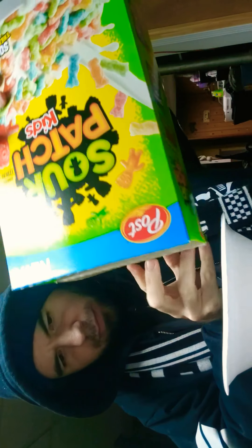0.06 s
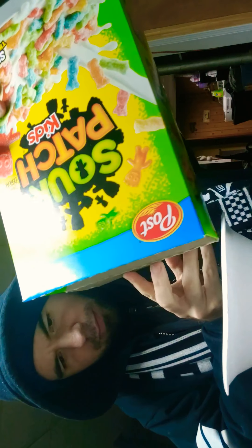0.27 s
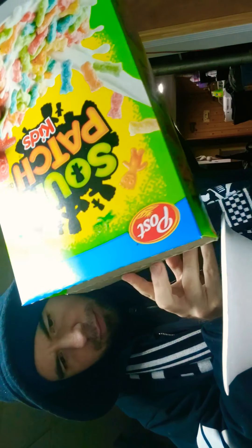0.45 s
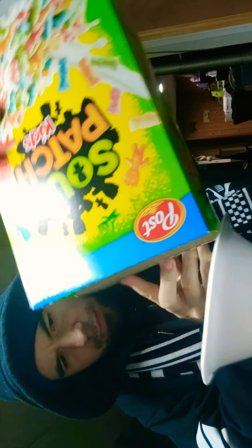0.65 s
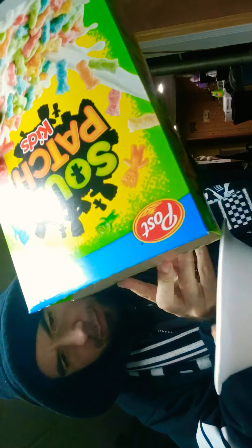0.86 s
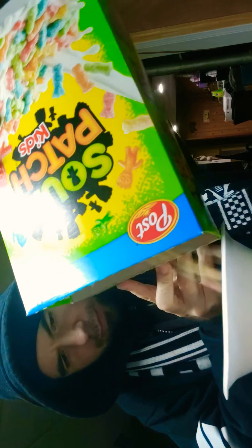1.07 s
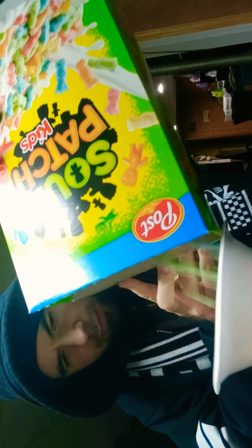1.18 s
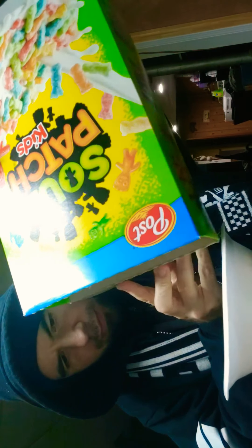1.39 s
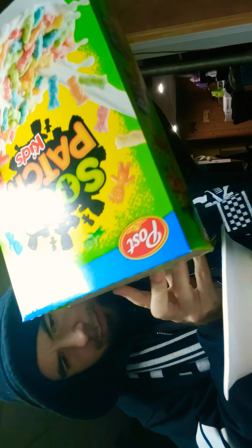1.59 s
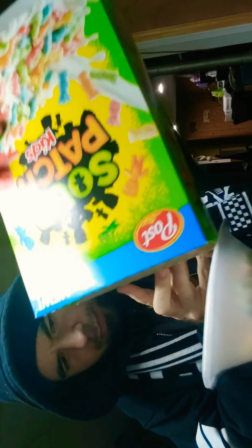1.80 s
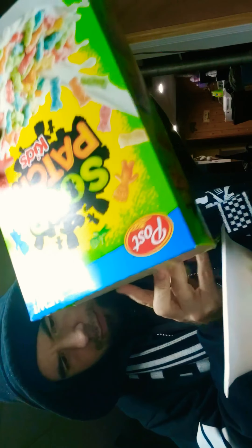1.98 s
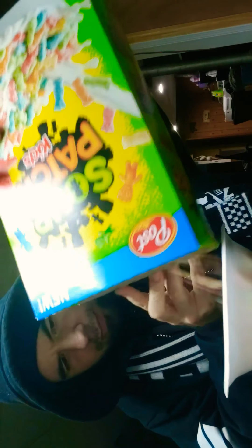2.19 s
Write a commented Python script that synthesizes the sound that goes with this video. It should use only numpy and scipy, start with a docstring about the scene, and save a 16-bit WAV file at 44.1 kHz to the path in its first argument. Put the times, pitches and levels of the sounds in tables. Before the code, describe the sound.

Cereal pours from a box in a dry, hollow clatter with light bag crackle.

```python
"""Pouring dry cereal

Cereal is shaken out of a tilted cardboard box toward a bowl, close by in a quiet room.
Short, dry knocks sound, then a rush of pieces tumbles and thins out; both excite the same hollow modes.
The liner bag crackles under the sliding pieces; the box rumbles in the hands and booms when bumped."""
import sys
import numpy as np
from scipy import signal
from scipy.fft import rfft, irfft, next_fast_len
from scipy.io import wavfile

SR = 44100
rng = np.random.default_rng(int(sys.argv[2]) if len(sys.argv) > 2 else 0)


def put_to_file(sound):
    """Save the sound as 16-bit audio at rate SR, in the file named by the first command-line argument."""
    columns = np.atleast_2d(sound).T  # one column per channel
    safe = np.clip(columns, -1, 1)
    whole_steps = np.round(safe * 32767)
    wavfile.write(sys.argv[1], SR, whole_steps.astype(np.int16))


N = 99225
TIME = np.arange(N) / SR

# Hollow, middle and treble modes that every contact excites: (frequency [Hz], level [dB], T60 [s])
LOW_MODES = [(398.3, -8, 0.036), (505, -6.5, 0.03), (595, -5.5, 0.016), (749.4, -4.5, 0.035)]
MAIN_MODES = [(948.7, -2.5, 0.083), (1082, -2, 0.085), (1150, 0.5, 0.092), (1229, 2, 0.055),
              (1311, -12.5, 0.029), (1522, -12, 0.09), (1792, -4, 0.018), (2008, -9, 0.053)]
CRACK_MODES = [(1675, 11.5, 0.0032), (2270, -1.5, 0.01), (2850, 0.5, 0.015), (3480, -3, 0.015),
               (3873, 1, 0.013), (5186, 5, 0.0036), (6280, -19.5, 0.0057)]


def from_db(db):
    """Amplitude ratio: a factor of ten for every 20 dB."""
    return 10 ** (np.asarray(db) / 20)


def unit_rms(x):
    """Normalisation to unit mean power."""
    return x / np.sqrt(np.mean(x ** 2) + 1e-20)


def envelope(curve):
    """Amplitude envelope interpolated through (time [s], level [dB])."""
    return from_db(np.interp(TIME, *np.transpose(curve)))


def band(x, low_hz, high_hz):
    """Butterworth band-pass filter."""
    edges_hz = [low_hz, min(high_hz, .45 * SR)]
    return signal.sosfilt(signal.butter(2, edges_hz, "band", fs=SR, output="sos"), x)


def colour(x, response):
    """Minimum-phase filter through (frequency [Hz], gain [dB])."""
    size = 2 * next_fast_len(N)
    hz, db = np.transpose(response)
    bin_hz = np.arange(size // 2 + 1) * SR / size
    gain = from_db(np.interp(np.log(bin_hz + 1), np.log(hz), db))
    cepstrum = irfft(np.log(gain))
    cepstrum[1:size // 2] *= 2   # folding the cepstrum makes the filter causal
    cepstrum[size // 2 + 1:] = 0
    return irfft(rfft(x, size) * np.exp(rfft(cepstrum)))[:N]


def ring(force, hz, t60):
    """Damped harmonic oscillator: each impulse starts an exponentially decaying sinusoid."""
    radius, angle = from_db(-60 / (t60 * SR)), 2 * np.pi * hz / SR
    return signal.lfilter([.5, 0, -.5], [1, -2 * radius * np.cos(angle), radius ** 2], force + 1e-18)


def impulses(per_s, spread_db):
    """Poisson process: independent impulses of uneven size and either sign."""
    sizes = from_db(spread_db * np.minimum(rng.exponential(1, N), 4)) * rng.choice([-1, 1], N)
    return sizes * (rng.random(N) < per_s / SR)


def place(onsets, shapes):
    """Superposition of waveforms, each delayed to its onset in seconds."""
    out = np.zeros(N + SR)
    for onset, shape in zip(onsets, shapes):
        start = max(int(onset * SR), 0)
        out[start:start + len(shape)] += shape
    return out[:N]


def room_tone():
    """Stationary noise, weighted toward low frequencies, forms the faint background."""
    # Background spectrum: (frequency [Hz], relative density [dB])
    spectrum = [(20, -45), (60, 1), (170, -1.5), (350, -7), (1100, -0.5), (3000, -17), (8000, -34),
                (15000, -30)]
    return from_db(-72) * unit_rms(colour(rng.standard_normal(N), spectrum))


def reverberation(direct, t60=0.18, delay_s=0.006):
    """Diffuse reflections: convolution with exponentially decaying noise, dulled in the treble."""
    tail = rng.standard_normal(N) * from_db(-60 * TIME / t60) * (TIME > delay_s)
    reflections = signal.fftconvolve(direct, tail / np.linalg.norm(tail))[:N]
    return from_db(-11) * band(reflections, 110, 5860)


def box_rumble():
    """Forced vibration: the hands move the cardboard, which radiates low-frequency noise."""
    # Handling envelope: (time [s], level [dB])
    handling = [(0.0, -63.5), (0.27, -71.5), (0.32, -40.5), (0.49, -64), (0.53, -50), (0.59, -57),
                (0.63, -41), (0.95, -54), (1.01, -44.5), (1.69, -50.5), (1.81, -60), (1.89, -36),
                (1.92, -48), (1.95, -31.5), (1.98, -45), (2.02, -40.5), (2.08, -49), (2.25, -44)]
    # Cardboard spectrum: (frequency [Hz], relative density [dB])
    spectrum = [(20, -38), (32, -29), (48, 3.5), (115, -2.5), (180, -0.5), (300, -4.5), (500, -7.5),
                (1000, -19), (3000, -105)]
    return from_db(0.5) * envelope(handling) * unit_rms(colour(rng.standard_normal(N), spectrum))


def box_bumps():
    """Free vibration: each jolt leaves the low modes of the box ringing, in alternating polarity."""
    # Jolts to the box: (time [s], level [dB])
    bumps = [(0.324, -31), (0.357, -36), (0.634, -32), (1.943, -19)]
    # Box modes: (frequency [Hz], level [dB], T60 [s])
    modes = [(56, -1, 0.052), (112, -10, 0.21), (172, -4, 0.041), (265, -6, 0.013), (477, 0.5, 0.078)]
    onsets, jolt_db = np.transpose(bumps)
    jolts = place(onsets, from_db(jolt_db)[:, None])
    booms = sum(from_db(db) * (-1) ** k * ring(jolts, hz, t60) for k, (hz, db, t60) in enumerate(modes))
    return signal.sosfilt(signal.butter(2, 700, fs=SR, output="sos"), booms)


def liner_crackle(bunches_per_s=150, bunch_db=6):
    """Modulated shot noise: pieces sliding over the liner bag make tiny clicks in bunches."""
    # Sliding envelope: (time [s], level [dB])
    sliding = [(0, -82), (0.2, -80.5), (0.33, -57), (0.42, -74), (0.48, -76), (0.57, -65), (0.61, -57),
               (0.74, -55), (0.78, -49), (0.92, -48), (1.01, -50.5), (1.11, -45), (1.23, -47),
               (1.29, -49.5), (1.39, -53), (1.62, -57), (1.69, -60.5), (1.745, -79), (1.8, -55.5),
               (1.88, -47), (1.91, -53.5), (1.98, -56), (2.09, -60.5), (2.15, -54.5), (2.25, -56.5)]
    # Liner spectrum: (frequency [Hz], relative density [dB])
    spectrum = [(300, -5), (1500, -14.5), (3600, 5), (5300, 0), (6500, -6), (8400, -14.5), (9800, -10.5),
                (10500, -14.5), (11900, -8), (13000, -19.5), (15500, -30)]
    bunches = np.interp(TIME * bunches_per_s, np.arange(N), np.clip(rng.standard_normal(N), -2, 2))
    crackle = impulses(per_s=2900, spread_db=2) * from_db(bunch_db * bunches)
    return from_db(4) * envelope(sliding) * unit_rms(colour(crackle, spectrum))


def tumble():
    """Random excitation: a stream of small pieces drives the modes into a continuous patter."""
    # Envelope of the stream: (time [s], level [dB])
    flow = [(0, -36), (0.05, -113), (0.21, -58.5), (0.32, -42), (0.42, -42.5), (0.49, -60), (0.58, -42.5),
            (0.64, -30), (0.74, -43), (0.79, -24.5), (0.9, -20), (1.01, -34.5), (1.12, -24), (1.23, -28),
            (1.3, -25.5), (1.4, -35.5), (1.6, -42), (1.74, -74), (1.8, -42), (1.91, -42.5), (2.0, -31.5),
            (2.09, -58), (2.25, -40)]
    impacts = impulses(per_s=600, spread_db=3)
    patter = np.zeros(N)
    for modes, group_db in ((LOW_MODES, -3), (MAIN_MODES, 0), (CRACK_MODES, -7)):
        for hz, db, t60 in modes:
            patter += from_db(db + group_db) * ring(impacts * rng.standard_normal(N), hz, t60)
    return from_db(-0.5) * envelope(flow) * unit_rms(band(patter, 260, 4100))


def rough_contacts(count, size=1400, touch_decay_s=0.0033, rebound_decay_s=0.0067, rebounds_per_s=450):
    """Multiple contact: an impulse, a burst of tiny touches and rebounds; one unit-energy force a row."""
    t = np.arange(size) / SR
    force = rng.standard_normal((count, size)) * np.exp(-t / touch_decay_s)
    force /= np.linalg.norm(force, axis=1, keepdims=True)
    force[:, 0] += 1   # the first impulse is as strong as the whole burst
    rebounds = rng.standard_normal((count, size)) * (rng.random((count, size)) < rebounds_per_s / SR)
    force += from_db(-1) * rebounds * np.exp(-t / rebound_decay_s)
    return force / np.linalg.norm(force, axis=1, keepdims=True)


def strike(onsets, db, modes, contacts, scatter_db=2):
    """Modal superposition: each mode's strength and sign vary at random with the spot that is hit."""
    out = np.zeros(N)
    for hz, mode_db, t60 in modes:
        strength = from_db(db + mode_db + scatter_db * rng.standard_normal(len(db)))
        strength *= rng.choice([-1, 1], len(db))
        out += ring(place(onsets, contacts * strength[:, None]), hz, t60)
    return out


def clack(hz, rise_s=0.0013):
    """Heavily damped resonance: it swells within a cycle or two and dies quickly."""
    t = TIME[:SR // 20]
    return t / rise_s * np.exp(1 - t / rise_s) * np.sin(2 * np.pi * hz * t)


def knocks():
    """Impulsive excitation: short, dry knocks, each a clack, a hollow ring and a crack in the treble."""
    # Short, dry knocks, with the last four levels relative to the first: (time [s], level [dB],
    # clack frequency [Hz], after-ring [dB], hollow lows [dB], crack [dB], sparkle [dB])
    dry_knocks = [(0.0043, -32.5, 1220.0, -9, -30, -43, -25), (0.0943, -50.5, 1440, -10, -3, -6, -15),
                  (0.113, -53, 1020, -22, -12, -18, -27), (0.2418, -15.5, 1220, -5, -6.5, -10.5, -25),
                  (0.2468, -16, 1180, -6.5, -11.5, -12.5, -33), (0.2549, -7.5, 1500, -17, -22, -15, -43),
                  (0.3006, -17.5, 1160.0, -17, -9, -12.5, -45), (0.3276, -14, 1097, -21, -13, -23, -41),
                  (0.3585, -4.5, 1300, -10.5, -11.5, -17.5, -39),
                  (0.3774, -21.5, 1300, -4, -13, -11.5, -28), (0.4196, -26.5, 1380, -10.5, -14, -13, -37),
                  (0.4316, -39, 1330.0, -8, -5, -6.5, -35), (0.5143, -13, 1285, -9, -12.5, -15.5, -35),
                  (0.5466, -33, 1040, -8, 1.5, -3.5, -34), (0.5957, -20, 1380, -18, -10, -13.5, -39),
                  (0.6211, -14, 1020, -8.5, -14, -15.5, -35), (0.6343, -11, 1140, -10, -14, -36, -54),
                  (0.661, -17, 1030.0, -5, -6, -20.5, -44), (0.6719, -14, 1110, -18, -14, -21, -46),
                  (0.7089, -22, 1170, -6, -10, -13, -38), (0.7567, -15, 1190, -3.5, -17, -9, -30),
                  (0.7662, -8, 1190, -8, -16, -12, -33), (0.7787, -9.5, 1100, -13, -22, -20, -41),
                  (0.805, -3, 1124, -9, -11, -11.5, -40), (0.8336, -5, 1103, -10.5, -22, -17.5, -35),
                  (0.8422, -9.5, 1107, -12.5, -13, -18, -34), (0.8579, -9, 1120, -7, -16, -14, -35),
                  (0.8833, -6, 1310, -4.5, -7, -12.5, -32), (0.8869, -8, 1270, -6, -20, -15, -39),
                  (0.897, -6.5, 1096, -11, -23, -37, -46), (0.9118, -14.5, 1240, -2.5, -3, -12, -25),
                  (0.9235, -8.5, 1125, -12, -14, -10.5, -40), (0.9481, -18.5, 1200, -10, -15, -15, -31),
                  (0.9726, -14.5, 1100.0, -6, -14, -17.5, -37), (0.9965, -13, 1020.0, -20, -24, -21, -40),
                  (1.03, -12, 1020, -6, -11, -12.5, -31), (1.0403, -4, 1266, -13, -25, -14, -38),
                  (1.0485, -11, 1320, -9, -12, -12, -28), (1.0547, -7.5, 1553, -10, -12, -12, -26),
                  (1.0627, -13, 1160, -4, -16, -14, -24), (1.0957, -17.5, 1170.0, -5, -9, -15, -27),
                  (1.1066, -15.5, 1114, -13, -24, -8.5, -26), (1.126, -11, 1240, -17, -19, -15, -32),
                  (1.1502, -7.5, 1350.0, -10, -29, -29, -38), (1.1593, -11, 1230, -12, -4.5, -26, -41),
                  (1.1759, -15.5, 1134, -10, -16, -24, -35), (1.1979, -15.5, 1620, -5.5, -18, -17, -24.5),
                  (1.2546, -12.5, 1080.0, -7, -11, -7, -38), (1.261, -8.5, 1110, -10, -15, -18, -39),
                  (1.2782, -12, 1110, -8.5, -13.5, -18, -36), (1.2922, -13.5, 1070, -10, -11, -23, -26),
                  (1.3149, -17.5, 1190.0, -10, -15, -13, -33), (1.332, -17, 1200, -6, -25, -13.5, -38),
                  (1.352, -17.5, 1280, -9, -21, -16, -44), (1.3822, -22, 1145, -6, -9, -15, -32),
                  (1.4102, -26, 1130, -8, -18, -16, -24), (1.4237, -12, 1150, -7.5, -13.5, -16.5, -29),
                  (1.4277, -12, 1110, -10, -15.5, -19, -41), (1.456, -19.5, 1210, -7, -4.5, -14, -24.5),
                  (1.4704, -15, 1145, -6, -17, -18, -30), (1.484, -16.5, 1160, -17, -16, -22, -35),
                  (1.5296, -17, 1170, -7, -6, -9, -25), (1.5453, -15.5, 1160, -21, -14.5, -23, -40),
                  (1.572, -24, 1340, -17, -10, -9, -16), (1.5952, -20.5, 1080, -8, -5.5, -13, -20),
                  (1.5986, -20, 1030, -4, -7.5, -12.5, -24), (1.6371, -26, 1460, -6.5, -3, -15, -29),
                  (1.6761, -26.5, 1180, -5, -7, -8.5, -31), (1.7096, -29.5, 1010.0, -11, -18, -15.5, -42),
                  (1.7672, -25, 1440, -8, -5, -9.5, -24), (1.7807, -27, 1170.0, -9, -5, -23, -35),
                  (1.7984, -33, 1470, -4, 1.5, -8, -31), (1.8425, -24, 1080.0, -13, -3, -4, -30),
                  (1.928, -20.5, 1130, -5, -10, -14, -20), (1.9463, -7, 1245, -3.5, -5.5, -18, -34),
                  (1.9536, -8.5, 1215, -9, -10.5, -23, -43), (1.9963, -22, 1290, -6, -4, -12.5, -38),
                  (2.0646, -23.5, 1370, -6, -3, -18.5, -30), (2.1125, -17.5, 1170, -7, -11, -20, -30),
                  (2.1339, -27.5, 1160.0, -22, -1.5, -15, -19), (2.175, -28, 1140, -9, 0, -8.5, -29),
                  (2.2036, -29, 1470, -17, -9, -15, -32), (2.2268, -22, 1460, -7, -5.5, -10, -22),
                  (2.2423, -22.5, 1160, -18, -4, -12, -28)]
    # Highest modes: (frequency [Hz], level [dB], T60 [s])
    sparkle_modes = [(7000, 0.5, 0.0047), (8800, -12, .003), (9700, -3, 0.0064), (11100, -7.5, 0.0056),
                     (11820, -2, 0.0049), (14200, -20, .002)]
    onsets, db, clack_hz, ring_db, hollow_db, crack_db, sparkle_db = np.transpose(dry_knocks)
    clean, rough = np.ones((len(onsets), 1)), rough_contacts(len(onsets))
    body = place(onsets, [gain * clack(hz) for gain, hz in zip(from_db(db - 1.5), clack_hz)])
    body += strike(onsets, db + ring_db - 3, MAIN_MODES, clean)
    body += strike(onsets, db + hollow_db - 2, LOW_MODES, clean)
    crack = strike(onsets, db + crack_db - 2, CRACK_MODES, rough)
    sparkle = strike(onsets, db + sparkle_db + 0.5, sparkle_modes, rough)
    return band(body, 243, 2270) + band(crack, 1300, 6370) + band(sparkle, 5000, 16000)


def scene():
    """Superposition of the direct sound, its reflections and the room tone."""
    direct = knocks() + tumble() + liner_crackle() + box_bumps() + box_rumble()
    return (direct + reverberation(direct) + room_tone())[None]


def record(dry, cutoff_hz=15600):
    """Transduction: an uneven frequency response, peak clipping and a steep low-pass filter."""
    # Microphone response: (frequency [Hz], gain [dB])
    microphone = [(30, -7), (300, 2), (700, 5), (1100, 1), (1500, -2), (2000, 3.5), (2400, 2.5), (3200, -1),
                  (4500, -1.5), (6000, -2), (8400, -1), (10500, -1.5), (12000, 4.5), (13000, -10.5),
                  (15500, 0.5)]
    clipped = np.clip(colour(dry[0], microphone), -.97, .97)
    return signal.sosfilt(signal.ellip(10, .1, 70, cutoff_hz, fs=SR, output="sos"), clipped)[None]


dry = scene()
out = record(dry)
put_to_file(out)
```